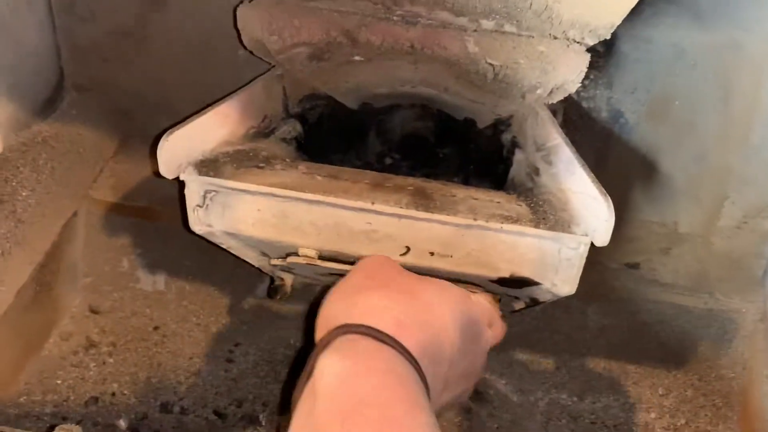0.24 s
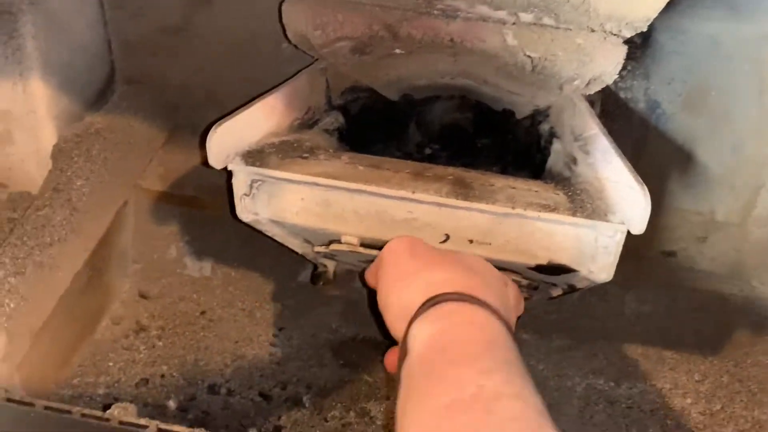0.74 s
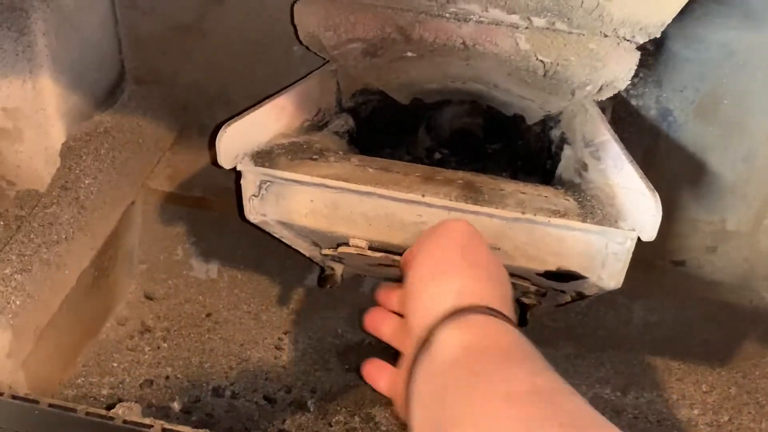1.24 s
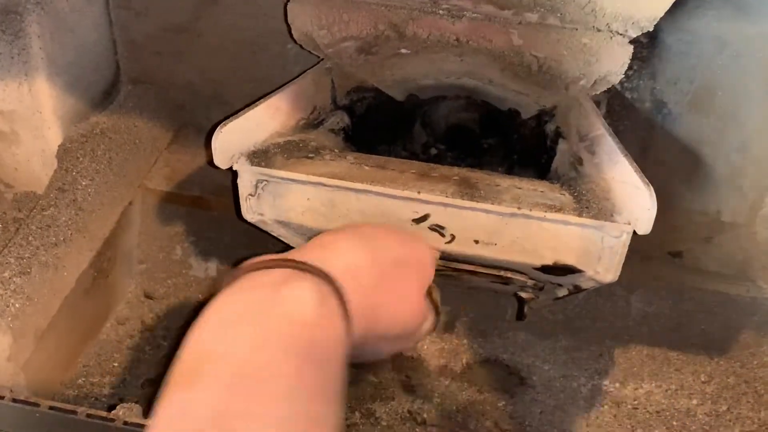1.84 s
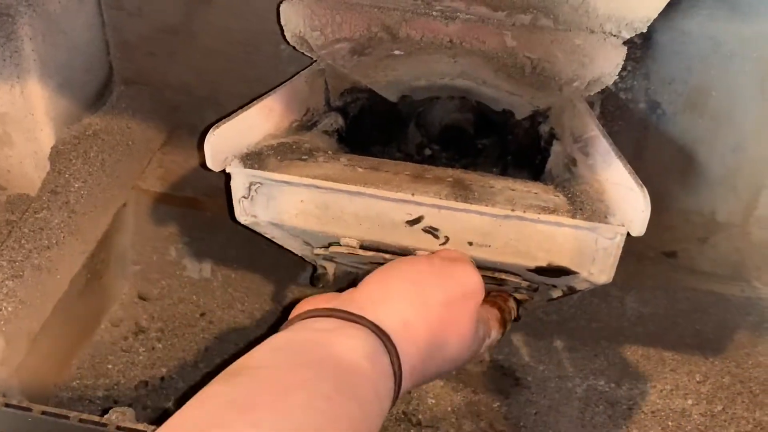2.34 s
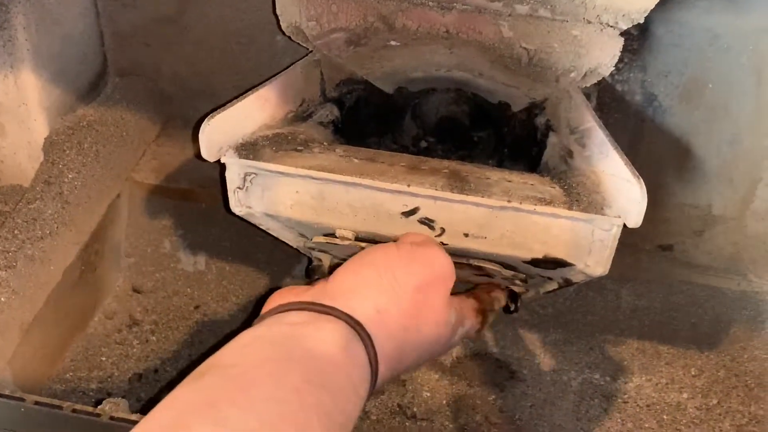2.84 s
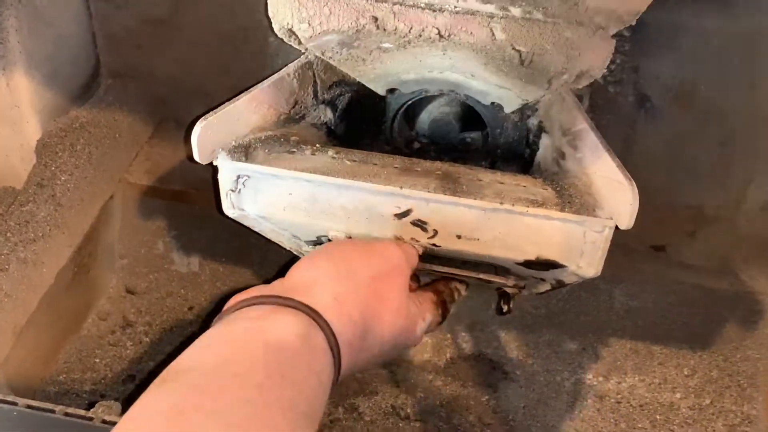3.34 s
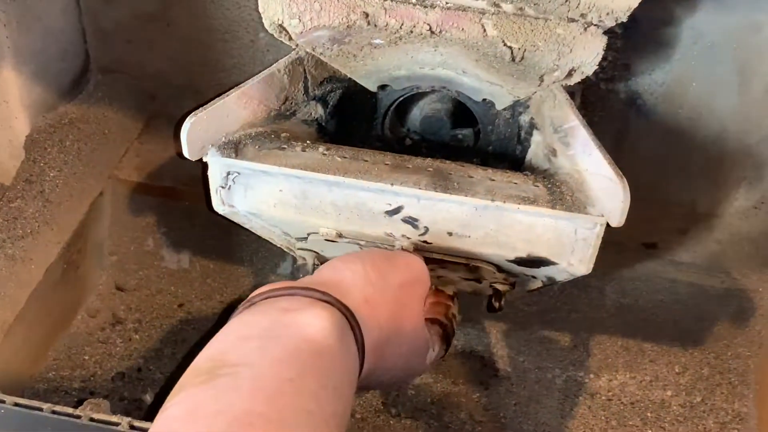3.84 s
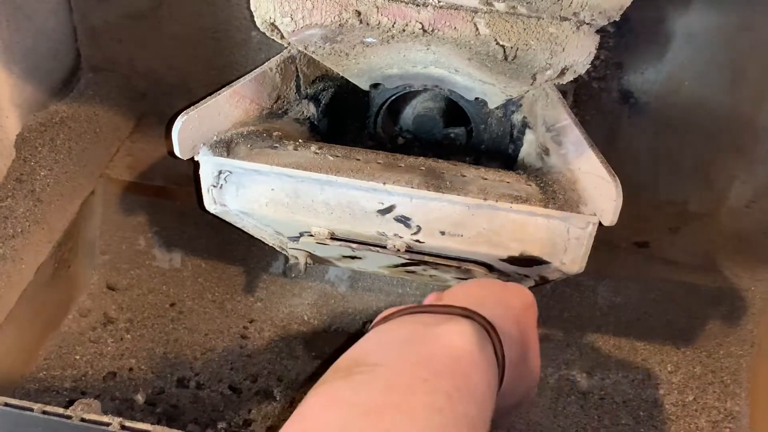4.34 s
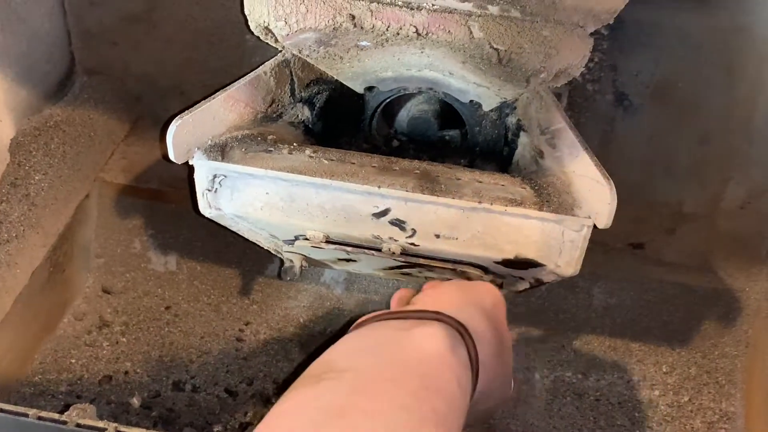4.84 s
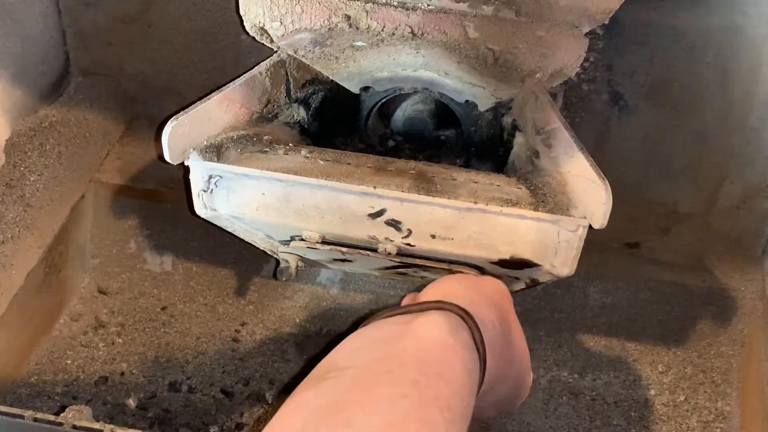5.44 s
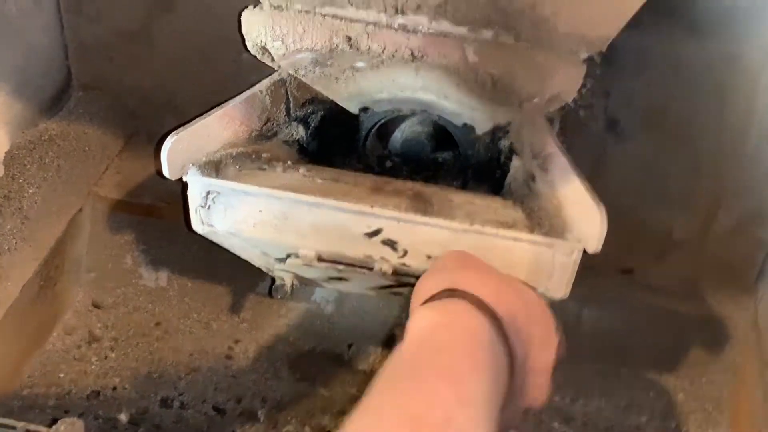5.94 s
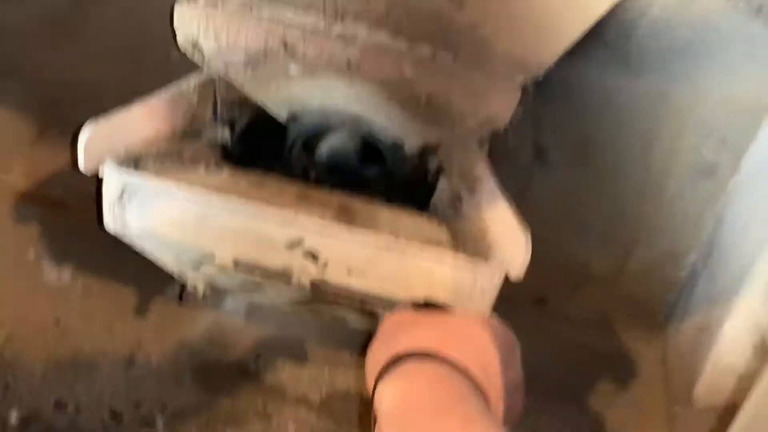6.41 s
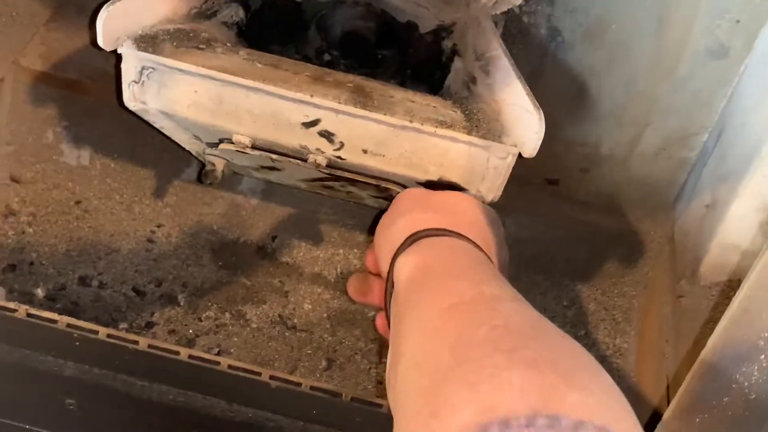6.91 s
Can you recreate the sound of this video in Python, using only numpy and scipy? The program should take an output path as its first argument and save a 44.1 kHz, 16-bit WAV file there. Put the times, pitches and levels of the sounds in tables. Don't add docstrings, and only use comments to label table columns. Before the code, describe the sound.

Indoors, a handheld phone about an arm's length away hears a tool working on a sheet-metal stove tray. At 0.0 to 0.1 seconds a short skid ends in a loud, hard clank with a brief steel ring and sliding ash. From 0.3 to 2.1 only faint scrapes, small ticks and soft rubbing are heard. At 2.4 and 2.5 strong clanks strike, with gritty slides and a dull knock at 2.6. After a soft scrape near 2.8, the busiest cluster comes from 3.1 to 3.5: several bright bangs, a high tinkle and a very hard final hit, then a thud at 3.7. Lighter clanks follow at 4.4, 5.0, 5.45, 6.0 and 6.6, among short scrapes and ticking grit, fading into faint scraping by 7.1. A low steady motor hum, quiet room air and soft bass bumps of the holding hand run underneath.

```python
import sys
import numpy as np
from scipy import signal
from scipy.fft import rfft, irfft, next_fast_len
from scipy.io import wavfile
from scipy.ndimage import uniform_filter1d

SR = 44100
rng = np.random.default_rng(int(sys.argv[2]) if len(sys.argv) > 2 else 0)


def output_pcm(signal):
    pcm = np.clip(np.atleast_2d(signal).T, -1, 1) * 32767
    wavfile.write(sys.argv[1], SR, np.round(pcm).astype(np.int16))


def ratio(d):
    e = np.asarray(d, float) / 20
    return 10 ** e


N = 316197
EARLY = 300
TOP_HZ = 15850


def evened(x):
    return x / np.sqrt(np.mean(x ** 2) + 1e-20)


def read(points, hz):
    f, value = np.transpose(points)
    return np.interp(np.log(hz + 1), np.log(f + 1), value)


def above(hz, edge_hz, steep=6):
    return 1 - 1 / (1 + (hz / edge_hz) ** steep)


def ringing(hz, db, t60, size):
    t = np.arange(size) / SR
    return np.exp(2j * np.pi * hz * t) * ratio(db - 60 * t / t60)


def bands(x, edges_hz):
    size = next_fast_len(x.shape[1] + EARLY)
    spectrum = rfft(np.pad(x, ((0, 0), (EARLY, 0))), size)
    hz = np.fft.rfftfreq(size, 1 / SR)
    fade = signal.windows.tukey(size, 2 * EARLY / size)
    steps = [above(hz, 135, 6)] + [above(hz, f, 7) for f in edges_hz] + [0 * hz]
    return [fade * irfft(spectrum * np.abs(a - b), size) for a, b in zip(steps, steps[1:])]


def pair(frames, size, gain, scatter=2.22):
    # hz, share
    likeness = [(30, .6), (100, .93), (200, .98), (500, .85), (900, .85), (2000, .93), (6000, .85)]
    a, b, c, d = rng.standard_normal((frames, size // 2 + 1, 4)).T
    hz = np.fft.rfftfreq(size, 1 / SR)[:, None]
    same = read(likeness, hz)
    left = a + 1j * b
    paths = evened(uniform_filter1d(rng.standard_normal(hz.shape), size=size // 64, axis=0))
    lag = np.exp(-2j * np.pi * hz * 4 / SR + 1j * scatter * paths * above(hz, 380, 0.97))
    right = same * left * lag + np.sqrt(1 - same ** 2) * (c + 1j * d)
    shaped = np.array([left, right]) * gain(hz, np.arange(frames) * size / 4 / SR)
    return signal.istft(shaped, nperseg=size, noverlap=size * 3 // 4)[1]


def tray(hz, rings, spread_db, tail_db, damping, late_db, lag=4, scatter=.9):
    # hz, t60_s
    tail_t60 = [(120, 0.29), (300, 0.12), (1000, 0.13), (3000, 0.088), (6000, 0.041), (12000, 0.032)]
    # hz, level_db (per Hz)
    tail_colour = [(53, -58.5), (90, -9.5), (685, -2.5), (1520, -13), (1850, -9), (2110, -11.5),
                   (5110, -7.5), (6760, -5.5), (8390, -5), (10900, -2), (14400, -4.5), (15900, -9.5)]
    size = rings.shape[1]
    luck = rng.standard_normal((2, len(hz)))
    gain = ratio(spread_db * luck[0])
    apart = -2 * np.pi * hz * lag / SR + scatter * luck[1] * above(hz, 1200, 1.5)
    modes = (np.array([gain, gain * np.exp(1j * apart)]) @ rings).imag

    def fade(f, s):
        drop_db = 60 * s * damping / read(tail_t60, f)
        late = ratio(late_db - 4.3 * above(f, 8000, 2.1) - 0.24 * drop_db)
        return ratio(read(tail_colour, np.minimum(f, 1.0 * TOP_HZ))) * (ratio(-drop_db) + late)

    tail = pair(size // 64 + 5, 256, fade)[:, 128:size + 128]
    ending = np.clip((size - np.arange(size)) / 3000, 0, 1)
    return (evened(modes) + ratio(tail_db) * evened(tail)) * ending


def gesture(t, start, length, sag, rise, release):
    held = np.clip(t - start, 0, length)
    db = -sag * (held - length * (sag < 0))
    db = db - rise * np.maximum(start - t, 0)
    return ratio(db - release * np.maximum(t - start - length, 0))


def pressure(t):
    # start_s, length_s, final_pressure_db, weight_db (relative), sharpness_db (relative)
    skids = [
        (-.03, 0.031, -26.5, -3.5, 0.5),
        (2.35, 0.048, -44.5, -22, 1),
        (3.09, 0.025, -52.5, 5, -1),
        (3.14, 0.038, -48, 9, 4.5),
        (3.39, 0.066, -34, -3, 2.5),
        (4.33, 0.031, -51.5, 7, -4.5),
        (4.372, 0.012, -44.5, 0, 3),
        (4.95, 0.021, -58.5, -7, -7),
        (6.54, 0.045, -52, 4.5, -2),
    ]
    # start_s, length_s, pressure_db, weight_on_tray_db (relative), sharpness_db (relative)
    strokes = [(0.371, 0.0089, -69.5, 5.5, -3.5), (0.619, 0.072, -58, 10.5, 1), (1.125, 0.071, -58, 0, 1.3),
               (1.493, 0.026, -76, -2.5, 6.5), (1.534, 0.028, -78, 10, -7), (1.782, 0.013, -65, -5, 8.5),
               (1.962, 0.067, -62, 2.5, -0.5), (2.058, 0.046, -59, -14, 4.5),
               (2.131, 0.045, -58, -1.5, 1.5), (2.783, 0.35, -65.5, 2.5, -10.5),
               (3.905, 0.032, -59.5, 7, -20.5), (3.942, 0.074, -54.5, -0.5, 1), (4.105, 0.066, -64, 8, -8),
               (4.257, 0.011, -64, -3.5, -16.5), (4.778, 0.06, -64, 9.5, -2.5),
               (5.22, 0.016, -64.5, 10, -6), (5.354, 0.029, -57, 11, 0), (5.537, 0.065, -59.5, 4.5, -15),
               (5.576, 0.018, -63.5, 3, 4.5), (5.752, 0.079, -59.5, -8.5, 5.5), (6.189, 0.045, -59, 4, 1.5),
               (0.753, 0.075, -69, 1.5, 1), (6.791, 0.066, -71, 9, -5), (6.85, 0.041, -57.5, 11.5, 3.5)]
    # start_s, length_s, pressure_db, weight_db (relative), sharpness_db (relative)
    slides = [(.09, 0.17, -47.5, 3.5, -0.5), (2.43, 0.048, -33, -1, 2.5), (2.52, 0.069, -42.5, 4, 5),
              (2.97, 0.036, -58.5, 13.5, -2), (3.29, .1, -47.5, 5, -2), (3.51, 0.14, -44, 0, 3.5),
              (3.69, 0.056, -42.5, -13.5, -12.5), (4.43, 0.06, -48, 4.5, 1), (4.55, 0.12, -57.5, 5, -6),
              (4.86, 0.08, -66, -6, 2), (5.045, 0.05, -66.5, 19, 8), (5.945, 0.071, -49.5, 8, -2),
              (6.05, 0.21, -68, 3, 9), (6.63, 0.063, -58, -1.5, 2), (7.06, 0.12, -54.5, -2, -16)]
    # time_s, pressure_db
    touch = [(0, -82), (1, -79), (1.7, -78), (2.7, -70), (3.6, -77), (4.6, -71), (5.5, -70), (6.1, -66),
             (6.45, -78), (6.8, -74), (7.17, -73)]
    releases = (129, 200, 258, 400)
    stroke_sag, slide_sag, skid_sag = 12, 120, -280
    attack = 892.5
    drone_lag_s, song_lag_s = 0.03, 0.0067

    def layers(db, weight_db, sharp_db):
        return [db + weight_db, db, db + sharp_db, db - 10.5 + 2.2 * sharp_db]

    fidget = uniform_filter1d(rng.standard_normal(len(t)), size=30)
    fidget = evened(uniform_filter1d(fidget, size=15))
    touch_db = np.interp(t, *np.transpose(touch)) + 3.5 * fidget
    power = ratio(np.array(layers(touch_db, 9, -4.5))) ** 2

    song, whine, efforts = 0, 0, []
    for start, length, db, weight_db, sharp_db in strokes:
        sung = gesture(t - song_lag_s, start, length, stroke_sag, 408, 303.5)
        song = song + (ratio(db + weight_db) * sung) ** 2
        whined = gesture(t, start, length, stroke_sag, attack, 320)
        whine = whine + (ratio(db - 3 + min(sharp_db, 0)) * whined) ** 2
        efforts.append((start, length, db - 1.5, -5.5, sharp_db))

    for rows, sag in ((efforts, stroke_sag), (slides, slide_sag), (skids, skid_sag)):
        for start, length, *effort in rows:
            for k, (db, release) in enumerate(zip(layers(*effort), releases)):
                lag = drone_lag_s * (k == 0)
                power[k] += (ratio(db) * gesture(t - lag, start, length, sag, attack, release)) ** 2
    return np.sqrt([*power, song, whine])


def drag():
    # pitch_hz, width_hz, level_db
    rubbed = [(223, 16, 8), (480, 25, -3), (928, 45, -3), (1660, 28, -9), (1870, 28, -15), (2345, 30, -12),
              (2580, 32, -6), (2690, 26, -17), (2905, 32, -10), (3510, 40, -14), (4215, 40, -7),
              (4390, 36, -7), (5500, 45, -20), (6720, 50, -21), (10400, 90, -30), (11350, 70, -28)]
    t = np.arange(N) / SR
    drives = np.array([np.interp(t, t[::44], gain) for gain in pressure(t[::44])])
    clumps = evened(uniform_filter1d(rng.standard_normal(N), size=500))
    size_db = 2.6 * np.minimum(rng.exponential(1, N), 3) + 2.3 * np.clip(clumps, -3, 2)
    slips = rng.random(N) < 6000 / SR
    grit = evened(slips * rng.standard_normal(N) * ratio(size_db))
    hz, width, db = np.array(rubbed).T[:, :, None]
    hop = round(.3 * SR)
    pushes = np.pad(grit * drives * ratio(-5.0), ((0, 0), (hop, 2 * hop)))
    near = np.sin(np.pi * np.arange(2 * hop) / (2 * hop))
    out = np.zeros((2, N + 5 * hop))
    for at in range(0, N + hop, hop):
        moved = hz * (1 + .003 * rng.standard_normal(hz.shape))
        rings = ringing(moved, db + 20 * np.log10(width), 2.2 / width, size=6500)
        parts = bands(tray(hz[2:, 0], rings[2:], 4.0, 7, 2.2, -25), (400, 1400, 5500))
        parts += bands(tray(hz[:, 0], rings, 2.0, -30, 2.5, -30, lag=1, scatter=.6), (600,))
        for part, push in zip(parts, pushes[:, at:at + 2 * hop] * near):
            sound = signal.fftconvolve(part, push[None], axes=1)
            sound /= np.sqrt((part ** 2).sum(1).mean())
            out[:, at:at + sound.shape[1]] += sound
    soft = ratio(-2.5 * above(np.fft.rfftfreq(out.shape[1], 1 / SR), 13000))
    return irfft(rfft(out) * soft, out.shape[1])[:, hop + EARLY:hop + EARLY + N]


def rumble():
    # time_s, level_db
    jolts = [(.09, -49.5), (.22, -63.5), (.72, -68.5), (1.248, -68.5), (1.969, -72), (2.449, -71),
             (2.6, -52.5), (3.25, -49), (3.54, -60.5), (3.75, -62), (4.41, -56), (5.05, -59.5), (5.36, -63),
             (5.63, -58.5), (5.97, -50), (6.16, -60), (6.62, -54.5)]
    grip_db = -72.5
    lumps = pair(N // 512 + 5, 2048, lambda hz, t: above(hz, 52, 3.3) * (1 - above(hz, 98, 3.0)) + 0 * t)
    t = np.arange(0, N, 44) / SR
    shake = sum(ratio(db) * gesture(t, s, 0, 0, rise=159.5, release=59.5) for s, db in jolts)
    return evened(lumps[:, :N]) * np.interp(np.arange(N) / SR, t, ratio(grip_db) + shake)


def hum():
    hum_hz, hum_db = 120.3, -59
    waver = uniform_filter1d(rng.standard_normal((N, 2)), size=1400, axis=0)
    waver = evened(uniform_filter1d(waver, size=700, axis=0))
    skirt = 1 + 0.22 * (waver[:, 0] + 1j * waver[:, 1])
    tone = skirt * np.exp(2j * np.pi * hum_hz * np.arange(N) / SR)
    return ratio(hum_db) * evened(tone.real) * ratio([[-.3], [.3]])


def air():
    # hz, level_db (per Hz)
    room_colour = [(15, -50), (25, -21.5), (123, 3.5), (228, -24.5), (498, -26), (2440, -21.5),
                   (2870, -30.5), (6630, -38), (8680, -26), (11100, -33), (13400, -26), (15700, -46.5)]
    air_db = -70
    frames = N // 256 + 5
    patches = uniform_filter1d(rng.standard_normal((frames, 513)), size=25, axis=0)
    patches = evened(uniform_filter1d(patches, size=20, axis=1)).T
    noise = pair(frames, 1024, lambda hz, t: ratio(read(room_colour, hz) + 3.0 * patches))
    return ratio(air_db) * evened(noise[:, :N])


def knocks():
    steel_hz = [165, 229, 290, 400, 499, 595, 707, 780, 928, 1055, 1345, 1663, 1841, 2000, 2580, 2830, 2955,
                3340, 3540, 3845, 4200, 4940, 5200, 6750, 7600, 8100, 9880, 10400, 10920, 11390, 12200,
                14500]
    # level_db, t60_s
    steel = [(-3, 0.074), (2, .2), (-2.5, 0.24), (-11, 0.16), (0.5, 0.14), (0.5, 0.076), (-6, 0.053),
             (-8.5, 0.064), (3, 0.14), (-2.5, .11), (-5, 0.13), (-13.5, 0.042), (-14, 0.24), (-13, .07),
             (-10, .08), (-5.5, .15), (1, 0.081), (-12, 0.14), (-11, 0.047), (-2, 0.14), (-4, 0.043),
             (-5, 0.12), (-13, 0.042), (-17.5, 0.064), (-9.5, 0.018), (0.5, 0.02), (5, 0.025), (0, .03),
             (3.5, .03), (-0.5, 0.036), (-5.5, .04), (-6, .04)]
    # time_s, peak_db, clank_db (relative), edge_hz, rattle_t60_s
    taps = [(.0085, -22, -13, 4201, .03), (1.036, -69, 0, 3711, .04), (1.962, -67.5, 2, 1670, .09),
            (2.066, -51, 4, 2581, .045), (2.4998, -26, -12, 3051, .013), (2.5121, -35, -6.5, 4901, .021),
            (2.952, -53, 12, 1591, .1), (3.116, -40, -3, 3877, .023), (3.2585, -35, -1, 2171, .037),
            (4.153, -57.5, 1, 2061, .036), (4.731, -62, 6, 2095, .036), (4.97, -50.5, 5, 2041, .045),
            (5.03, -50.5, 6, 2781, .019), (5.224, -56, -2, 3581, .09), (5.959, -70, 19, 2951, .077),
            (6.532, -67, 1, 2071, .037), (7.038, -60, 15, 2845, .044)]
    # time_s, peak_db, clank_db (relative), edge_hz (struck edge), rattle_t60_s
    blows = [(.0412, -23.5, -4, 3720, 0.034), (.0575, -23, -9, 3900, 0.025), (2.3915, -19, -7, 2560, 0.043),
             (2.4015, -28, -1, 4400, 0.023), (2.5543, -41, 4, 2830, 0.015),
             (3.1788, -20.5, -7.5, 3770, 0.018), (3.19, -28, -10, 2860, 0.015),
             (3.2301, -25, -7.5, 3800, 0.05), (3.4645, -22, -5, 1540, 0.024),
             (3.4685, -16.5, -10, 2700, 0.034), (4.3944, -34, -13, 3080, 0.02),
             (4.399, -33.5, -7, 3950, .022), (4.8296, -44, -11, 2610, 0.024),
             (5.0045, -32, -9, 3140, 0.014), (5.011, -29.5, -10.5, 2950, 0.0057),
             (5.453, -43.5, 5, 4740, 0.019), (5.5815, -52, 6, 2830, 0.024), (5.9371, -51.5, 5, 1700, 0.025),
             (6.0155, -36.5, -6, 2960, 0.026), (6.5855, -42.5, -9.5, 2006, 0.083),
             (6.5973, -37, -4, 2010, 0.033)]
    # time_s, peak_db, clank_db (relative), edge_hz, rattle_t60_s
    thuds = [
        (.2315, -60, 12, 1778, .02),
        (.385, -69, 10, 3035, .047),
        (2.609, -57.5, 14, 2001, .026),
        (3.054, -67, 18, 1591, .013),
        (3.6755, -57, 4, 1871, .033),
        (3.7405, -43, 11, 1653, .02),
        (4.267, -68, 17, 1681, .025),
    ]
    # time_s, peak_db, clank_db (relative), edge_hz, rattle_t60_s
    ticks = [(1.55, -68, -6, 6921, .051), (2.764, -74, -6, 3401, .03), (2.912, -61.5, -1, 6771, .024),
             (2.994, -55, -16, 4801, .012), (4.3575, -45, 2, 2751, .04), (4.4998, -57, 4, 2931, .044),
             (5.668, -60, 2, 3451, .032), (5.879, -64, -5, 1751, .021), (6.796, -63, -2, 1621, .04),
             (6.888, -57, 4, 2947, .075), (5.242, -64, -7, 3501, .031), (5.3915, -61, -5, 2901, .031),
             (5.6135, -61, -3, 2901, .026), (3.963, -67, -7, 4201, .081), (3.425, -52, -5, 3301, .1),
             (2.3845, -48, -11, 6501, .031), (6.843, -63, -2, 2901, .041), (6.2015, -68, -2, 4201, .031),
             (1.4915, -71, -4, 2501, .021), (4.115, -67, 7, 1661, .021)]
    kinds = ((blows, 0.5, .0012), (taps, -9.5, .0018), (thuds, -39, .003), (ticks, 1.5, .0025))
    thump_db, spark_db, spark_fade = -6, -7, 350

    hz = np.array(steel_hz)
    steel_db, t60 = np.transpose(steel)
    rings = ringing(hz[:, None], steel_db[:, None], t60[:, None], size=10500)
    out = np.zeros((2, N + SR))
    t = np.arange(3001) / SR
    events = [(*row, sizzle_db, rise) for rows, sizzle_db, rise in kinds for row in rows]
    for s, db, clank_db, edge_hz, rattle, sizzle_db, rise in events:
        grit = rng.standard_normal(len(t)) * ratio(2.5 * rng.exponential(1, len(t)))
        blow = grit * ratio(-60 * t / rattle) * (1 - np.exp(-t / rise))
        struck = np.vstack([rings, ringing(edge_hz, -1.8, 0.055, size=10500)])
        answer = tray(np.append(hz, edge_hz), struck, 4, 0.35, 1.0, -22.5)
        sound = signal.fftconvolve(answer, blow[None], axes=1)
        *parts, spark = bands(sound, (380, 1400, 5500, 13200))
        parts.append(spark * ratio(-spark_fade * np.arange(spark.shape[1]) / SR))
        levels_db = (clank_db + thump_db, clank_db, 0, sizzle_db, sizzle_db + spark_db)
        for part, rel_db in zip(parts, levels_db):
            top = np.sqrt(uniform_filter1d((part ** 2).mean(0), size=176).max())
            out[:, round(s * SR):][:, :part.shape[1]] += ratio(db + rel_db - 0.5) * part / top
    return out[:, EARLY:N + EARLY]


def linger():
    # time_s, pitch_hz, level_db, t60_s, spread (share of pitch)
    lingering = [(.07, 593, -30, .24, .008), (.232, 1060, -46, .08, .06), (.236, 597, -52, .2, .004),
                 (3.234, 7600, -33, .2, .001), (3.234, 9870, -27, .11, .003), (3.893, 11000, -70, .15, .002),
                 (5.02, 2780, -54, .33, .09), (5.458, 5230, -49, .2, .001), (2.765, 3400, -69, .3, .05),
                 (2.85, 3300, -68, .2, .05), (3.182, 5200, -45, .3, .004), (.043, 3845, -24, .13, .003),
                 (.012, 1345, -30, .13, .008), (.045, 1340, -33, .12, .008), (.018, 205, -32, .15, .04),
                 (.05, 222, -29, .2, .07), (.043, 10950, -27, .12, .004), (2.395, 706, -25, .2, .006),
                 (2.396, 290, -30, .2, .01), (2.394, 1350, -33, .08, .01), (.012, 500, -27, .12, .03),
                 (.012, 4200, -30, .06, .01), (3.232, 3849, -30, .1, .003), (3.18, 490, -32, .1, .03),
                 (2.394, 925, -25, .15, .01), (3.468, 500, -28, .05, .03), (3.47, 8100, -25, .12, .003),
                 (3.117, 8100, -50, .12, .003), (4.36, 11400, -47, .15, .003), (4.397, 11400, -43, .15, .002),
                 (5.458, 12000, -55, .15, .002), (5.458, 11000, -54, .14, .002), (5.458, 8150, -52, .15, .002),
                 (5.458, 14700, -56, .12, .003), (2.765, 11000, -67, .08, .003), (2.394, 1122, -30, .1, .01),
                 (.06, 1053, -32, .11, .005), (1.25, 1090, -66, .2, .01), (6.6, 2030, -48, .1, .01),
                 (6.6, 10900, -52, .15, .005),
                 (0.0094, 7100, -29, 0.083, .003), (0.056, 2800, -43.5, 0.31, .05),
              (0.065, 3840, -51, .25, .006), (3.234, 13000, -42, .1, .002), (3.234, 15000, -47, .1, .002),
              (3.234, 13300, -42, .1, .002), (4.36, 14200, -53, .1, .002),
              (4.397, 15000, -51, 0.13, 0.0018), (4.397, 14200, -52, .15, .002),
              (5.458, 16000, -48.5, 0.15, .002), (5.458, 14050, -58, .1, .002),
              (5.668, 11400, -59.5, 0.1, .002), (5.58, 14000, -54, .06, .003),
              (5.008, 4900, -33.5, 0.073, 0.0057), (3.425, 3300, -42.5, .12, 0.044),
              (3.47, 4100, -20, 0.057, 0.0065), (0.62, 4500, -68.5, 0.12, .003)]
    size = 20000
    rise = np.clip(np.arange(size) / 150, 0, 1)
    out = np.zeros((2, N + SR))
    for s, hz, db, t60, spread in lingering:
        near_hz = hz * (1 + spread * np.linspace(-1, 1, 5)[:, None])
        tones = ringing(near_hz, db, t60, size)
        share = np.where(np.arange(5) == 2, 1 - 8 * spread, .3 + 8 * spread)
        phase = 2 * np.pi * (rng.random(5) - hz * np.array([[0], [2.5]]) / SR)
        phase = phase + .3 * rng.standard_normal((2, 5))
        out[:, round(s * SR):][:, :size] += (share * np.exp(1j * phase) @ tones).imag * rise
    return out[:, :N]


def scene():
    return drag() + rumble() + hum() + air() + knocks() + linger()


def low_pass(x):
    return signal.sosfilt(signal.butter(12, 16660, fs=SR, output="sos"), x)


def record(dry):
    merge_hz, lead = 6600, 9
    size = next_fast_len(N + 64)
    hz = np.fft.rfftfreq(size, 1 / SR)
    passed = above(hz, 38, 1.7) * (1 - above(hz, TOP_HZ, 110))
    left, right = rfft(dry, size) * passed
    share = above(hz, merge_hz, 6.9)
    copy = -1j * left * np.exp(2j * np.pi * hz * lead / SR)
    right = np.sqrt(1 - share ** 2) * right + share * copy
    mix = irfft(np.array([left, right]), size)[:, :N]
    return low_pass(mix)


dry = scene()
out = record(dry)
output_pcm(out)
```